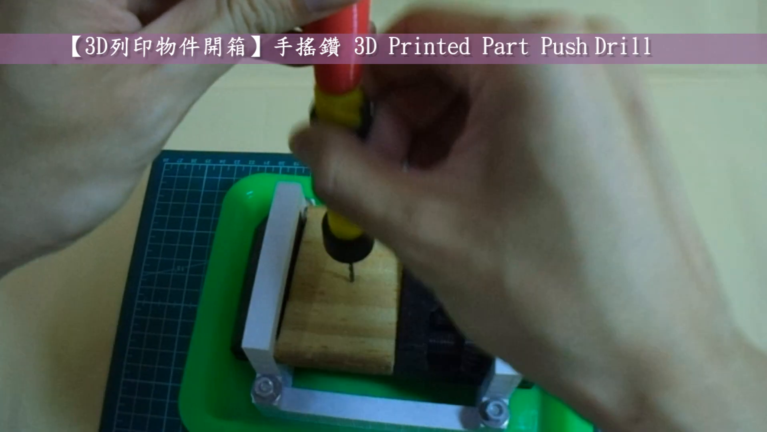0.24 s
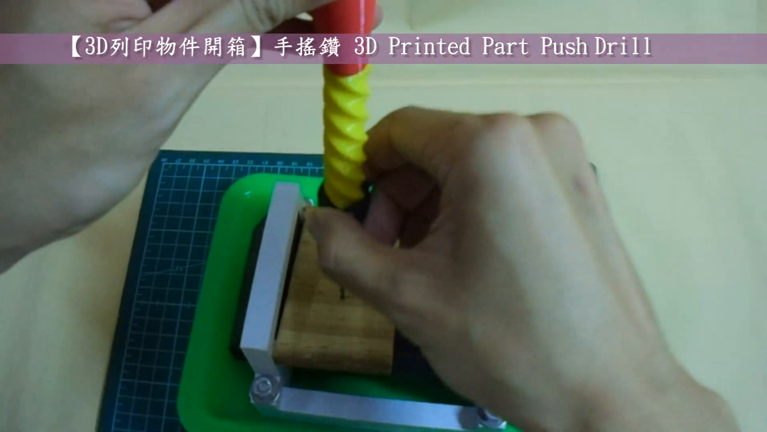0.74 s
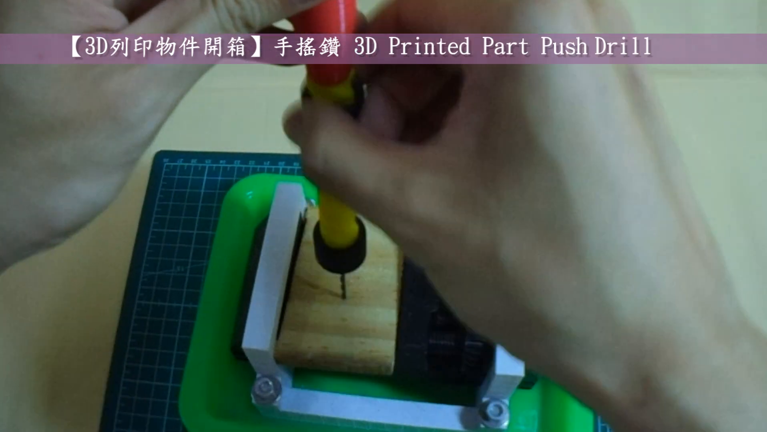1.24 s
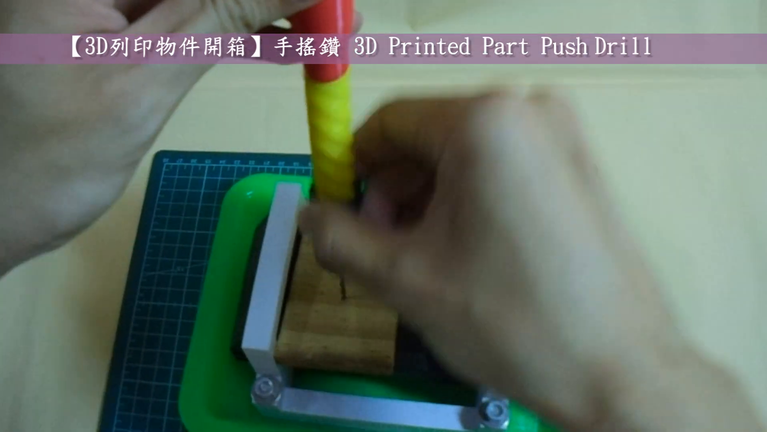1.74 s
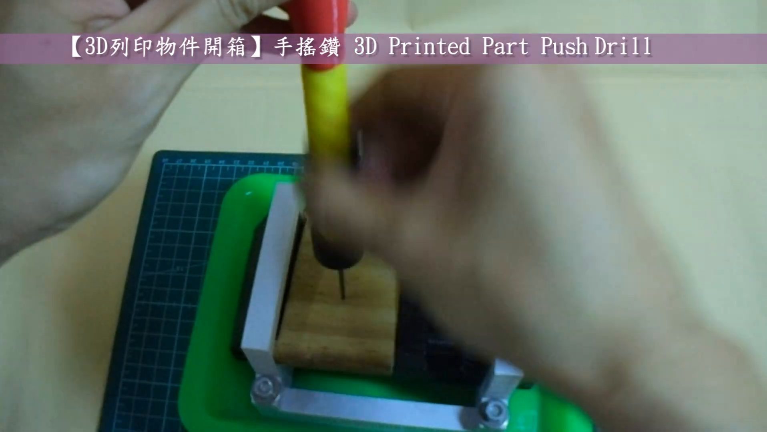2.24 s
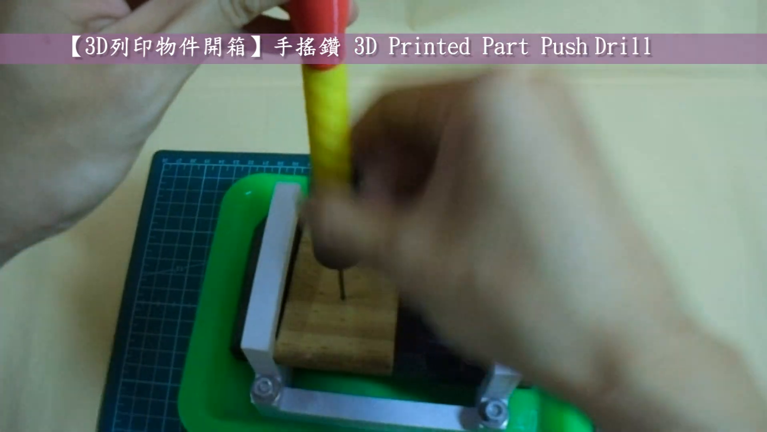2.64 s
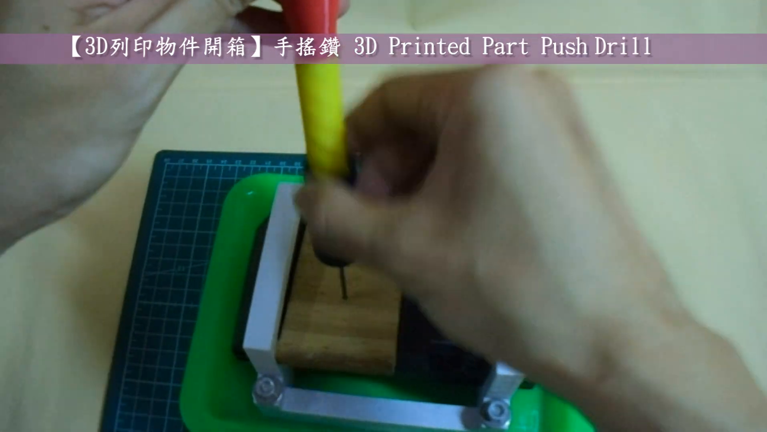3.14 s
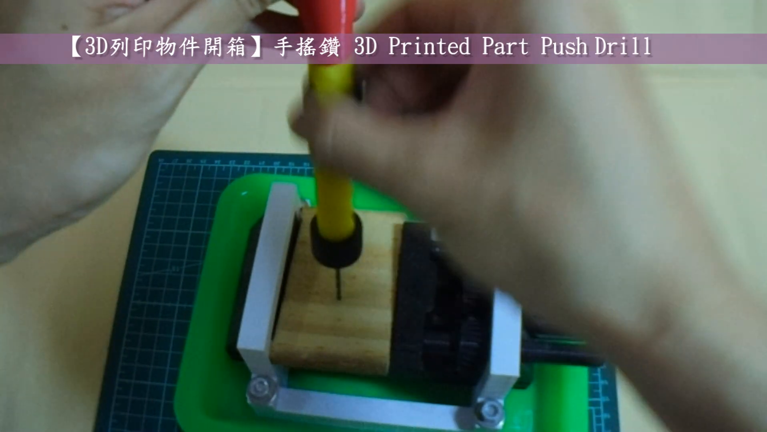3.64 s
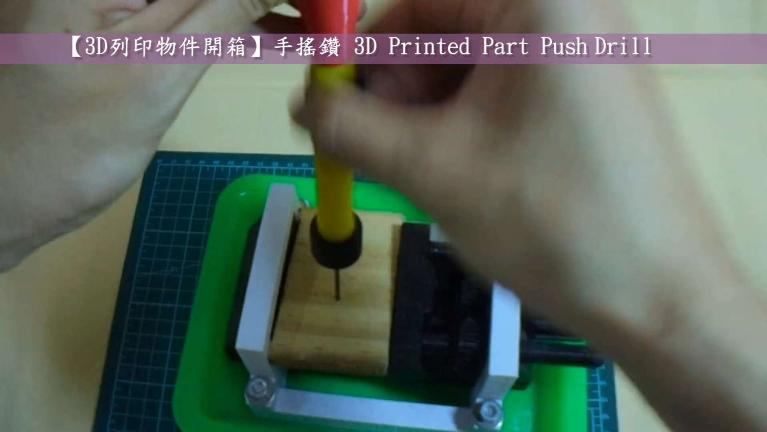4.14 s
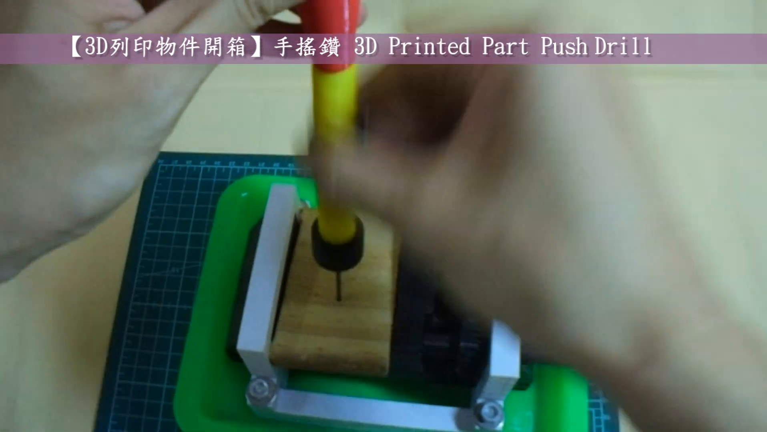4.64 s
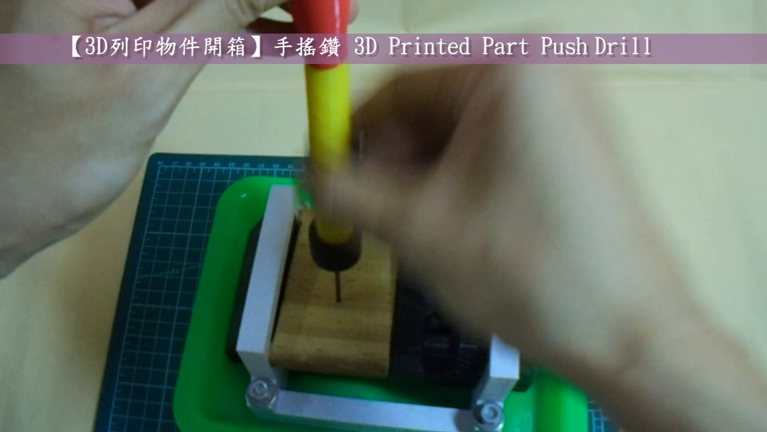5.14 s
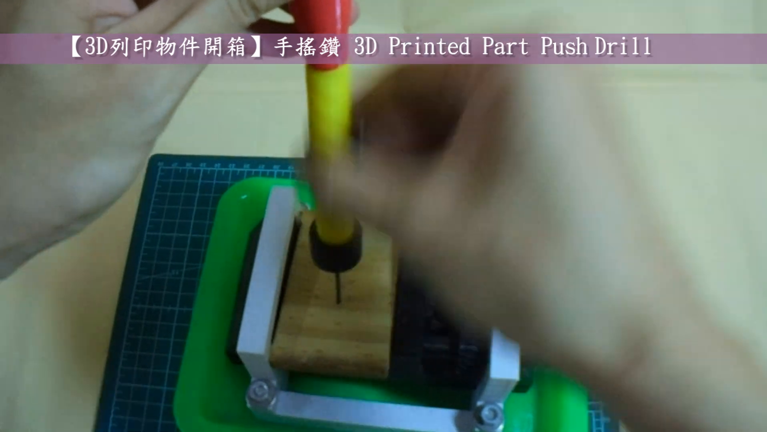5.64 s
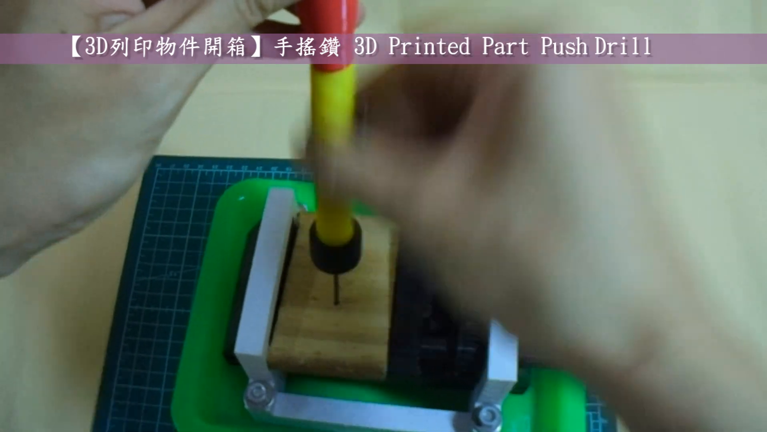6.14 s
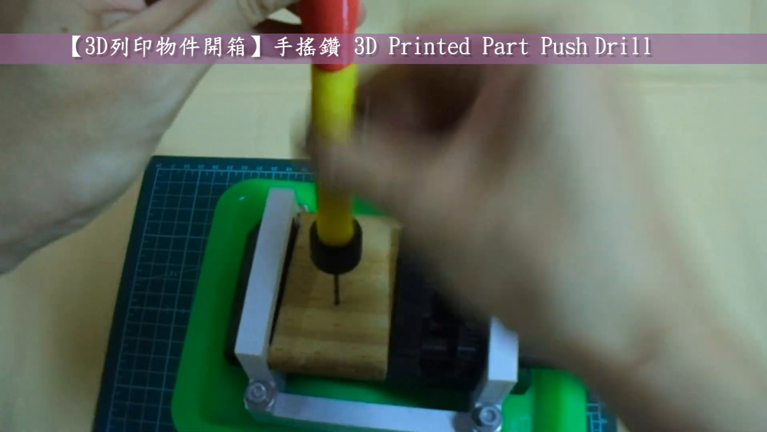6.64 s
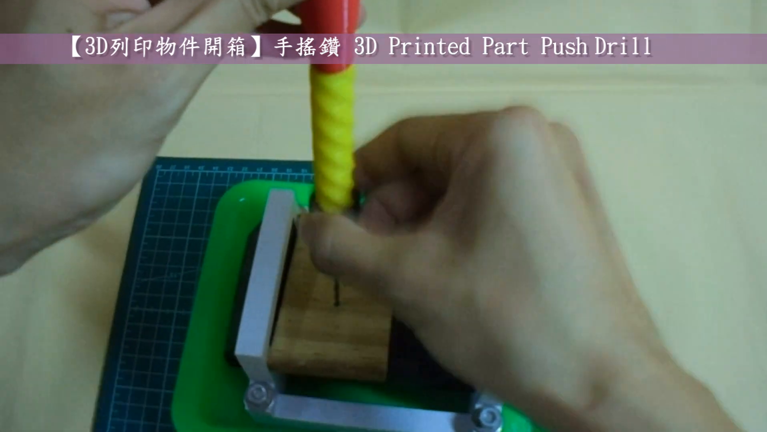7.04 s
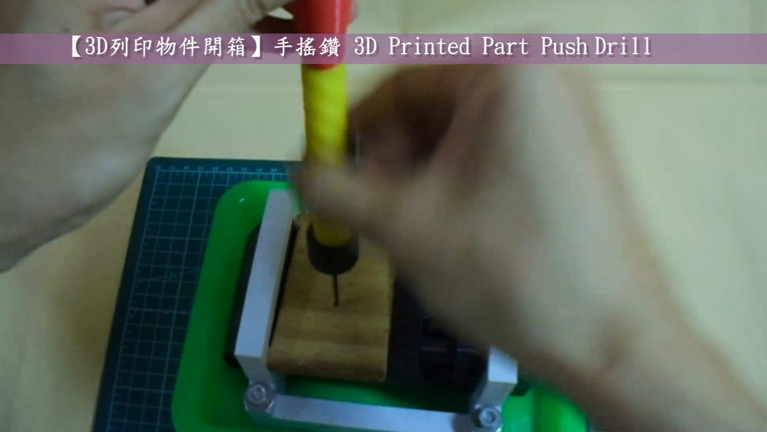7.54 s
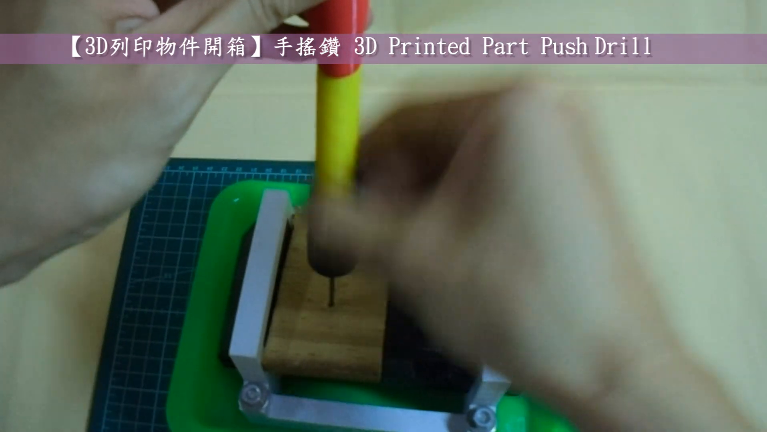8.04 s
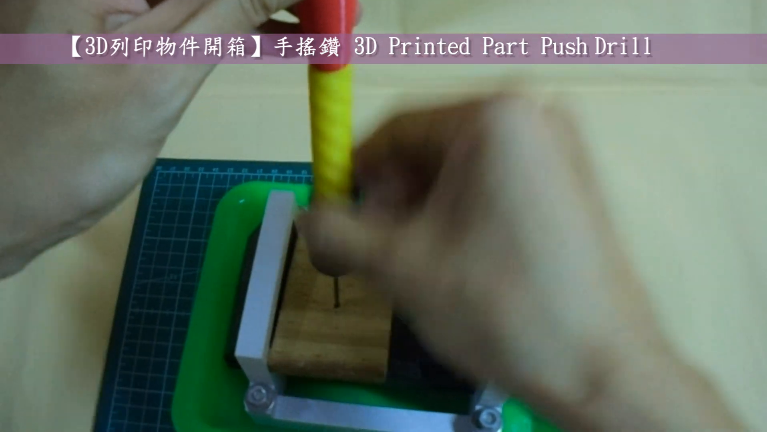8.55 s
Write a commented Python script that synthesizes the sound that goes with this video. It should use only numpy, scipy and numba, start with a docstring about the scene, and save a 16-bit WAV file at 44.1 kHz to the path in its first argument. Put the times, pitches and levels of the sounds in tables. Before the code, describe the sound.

In a small room with low hum and soft air noise, a plastic push drill starts with faint scrapes, a dull knock and two slow, groaning strokes. It then settles into rapid back-and-forth rasping, each stroke a gritty rising and falling zip with squawky edges and small clicks. Close, lo-fi microphone with dull treble.

```python
"""In a small room, a plastic spiral push drill is pumped by hand, about four times a second, into clamped wood.
On every pull and push the nut rasps over the fine ridges of the shaft: uneven noise grains and gliding tones.
The zip follows its speed; squawk, chatter and groan join in, and the loose nut rattles at each turn.
Shaft, block and vice ring as a bank of resonances. Mains and fan hum as wavering sines over shaped air noise."""
import sys
import numpy as np
from scipy import signal
from scipy.fft import rfft, irfft, next_fast_len
from scipy.io import wavfile
from scipy.ndimage import uniform_filter1d, minimum_filter1d
from numba import njit

SR = 44100
rng = np.random.default_rng(int(sys.argv[2]) if len(sys.argv) > 2 else 0)


def wav_record(signal):
    """Record a signal, one row per channel, as 16-bit PCM in the file named by sys.argv[1]."""
    frames = np.transpose(np.atleast_2d(signal))
    bounded = np.clip(frames, -1, 1)
    # unit amplitude maps onto the largest positive 16-bit level
    quanta = np.round(bounded * 32767).astype(np.int16)
    wavfile.write(sys.argv[1], SR, quanta)


N = 387638
TIME = np.arange(N) / SR
FREQ = np.arange(N // 2 + 1) * SR / N + 1e-6
RATE_HZ = 11025  # low sample rate of the recorder; the air noise ends at half of it

# hand strokes, pull and push in turn: start_s, end_s, top_ridge_rate_hz, level_db (drive into the body),
# lean_db (how much harder it ends than it starts)
STROKES = [(0.0, 0.028, 2150, -24, -15), (0.071, 0.094, 1446, -29, 4), (0.188, 0.231, 1936, -35, -7),
           (0.307, 0.38, 2720, -22, -0.5), (0.435, 0.547, 3100, -17.5, -6), (0.573, 0.649, 2756, -19, 1.5),
           (0.78, 0.853, 1590, -21, -12), (0.907, 1.04, 1880, -21.5, -0.5), (1.111, 1.224, 2907, -20, 1),
           (1.259, 1.379, 3436, -16.5, 1.5), (1.426, 1.53, 3870, -17, -2),
           (1.574, 1.682, 2940, -17.5, -1.5), (1.736, 1.832, 2996, -17.5, 2),
           (1.872, 1.982, 2910, -17.5, 6.5), (2.029, 2.13, 2840, -17, -4.5), (2.183, 2.272, 2870, -17, 0.5),
           (2.325, 2.424, 3390, -18, -3), (2.461, 2.571, 3165, -18.5, 2.5),
           (2.615, 2.718, 3750, -15.0, -4.5), (2.754, 2.866, 3210, -17, 1.5), (2.908, 2.996, 3736, -15, 0),
           (3.041, 3.149, 3620, -17.0, 3), (3.18, 3.29, 3690, -16, 3), (3.34, 3.446, 3460, -17, 7),
           (3.483, 3.597, 3437, -16.0, -2.5), (3.638, 3.737, 3460, -17.0, 2.5),
           (3.782, 3.872, 4050, -15.5, -1.5), (3.902, 4.017, 3730, -16.5, 2),
           (4.055, 4.156, 4000, -15.5, -5), (4.19, 4.295, 3836, -15.5, 3), (4.326, 4.426, 3835, -15, -0.5),
           (4.463, 4.559, 4104, -15.5, 3), (4.596, 4.693, 4470, -12.5, -7.5),
           (4.727, 4.829, 4280, -15, 3.5), (4.851, 4.954, 4040, -16, 5), (4.987, 5.082, 4260, -14.5, 7),
           (5.115, 5.21, 4050, -13.5, -1), (5.251, 5.337, 3980, -14, 3), (5.372, 5.464, 4300, -15.0, 2),
           (5.494, 5.592, 4230, -15.5, 5.5), (5.624, 5.713, 4430, -15.5, -4),
           (5.745, 5.838, 3960, -14, 3.5), (5.865, 5.953, 4660, -15, -7), (5.986, 6.079, 4480, -14, 7.5),
           (6.101, 6.197, 4580, -14, -3), (6.226, 6.324, 4590, -15.0, 8), (6.35, 6.444, 4630, -15.5, -5),
           (6.477, 6.574, 3825, -15, 11), (6.6, 6.7, 4660, -14, -7), (6.724, 6.821, 4240, -15, 7.5),
           (6.851, 6.944, 4830, -12.5, -7), (6.972, 7.071, 4340, -14.5, 6.5),
           (7.092, 7.183, 4852, -12.5, -3), (7.214, 7.31, 4517, -14, 7), (7.333, 7.415, 4487, -12.5, -7),
           (7.461, 7.544, 4610, -15.5, 4.5), (7.575, 7.652, 3800, -15, -7.5),
           (7.697, 7.781, 4030, -15.5, 6.5), (7.817, 7.91, 4380, -12.5, -7.5),
           (7.956, 8.037, 4320, -15.5, 2.5), (8.064, 8.163, 4770, -15, -2.5),
           (8.192, 8.288, 4455, -16.5, 0), (8.316, 8.416, 4510, -14.5, 0.5), (8.452, 8.553, 4165, -18, 3),
           (8.572, 8.672, 4800, -15.5, 5.5), (8.703, 8.797, 4220, -16.5, -4.5)]


def drill():
    """Rasp, zip, squawk, groan, chatter and catches all drive the same body."""
    # modes of shaft, block and vice: pitch_hz, width_hz, level_db
    body_modes = [(378, 76, -18.5), (536.4, 35, -14), (664.5, 70, -9), (839, 74, -16), (990, 90, -9),
                  (1109, 80, -3), (1230, 72, 0.5), (1310, 51, 3), (1398, 70, 1), (1636.5, 89.4, 10.5),
                  (1753, 121.7, 10.5), (1897, 119, 8), (2180, 166, 4), (2419, 106, 0.5), (2890, 263, 4),
                  (3372, 75, 4.5), (3512, 130, 3), (3840, 180, 5), (4212, 145, 5.5), (4613, 290, 2.27),
                  (5420, 440, 1)]
    rate, pulling = ridge_rate()
    rasp_db, zip_db, squawk_db = pressure()
    grip = slips(per_s=130, decay_s=0.0057, steady=.25)
    force = rasp(rate, rasp_db, grip) + zip_tone(rate, zip_db, grip)
    force += squawk(rate, squawk_db, grip) + groan(rate, rasp_db)
    force += chatter(rate, pulling, rasp_db, grip) + catches()
    return ring(force, body_modes)


def rasp(rate, level_db, grip):
    """Tiny impacts on the ridges: soft and dull in slow sliding, short and bright in fast."""
    ticks = grip * grains(per_s=4000, spread_db=3)
    soft = signal.sosfilt(signal.butter(1, 2400, fs=SR, output="sos"), ticks)
    bright = ticks - 0.31 * soft
    sharp = np.clip((rate - 450) / 2850, 0, 1)
    return undb(level_db) * (sharp * bright + (1 - sharp) * soft)


def zip_tone(rate, level_db, grip):
    """Evenly spaced ridges sing at the ridge rate; too slow a nut does not zip."""
    # hard pumping shakes the nut and smears the tone
    shake = np.interp(TIME, [1.5, 4.5], [.04, .068])
    fast_enough = np.clip((rate - 1400) / 1100, 0, 1)
    return undb(level_db) * fast_enough * np.sqrt(grip) * ridge_tone(rate, shake)


def squawk(rate, level_db, grip):
    """Friction squawk: a noisy band that glides with the ridge rate."""
    return undb(level_db) * grip * scrape(rate, width_hz=920)


def chatter(rate, pulling, rasp_db, grip):
    """On the pull the tilted nut chatters at a quarter of the ridge rate, never below 1180 Hz."""
    centre_hz = np.maximum(rate * 0.25, 1180)
    return pulling * undb(rasp_db - 13) * grip * scrape(centre_hz, width_hz=300)


def groan(rate, rasp_db):
    """A lazy stroke groans on its ridges: the low gliding tone stands clear of the squawk."""
    slow_enough = np.clip((1640 - rate) / 200, 0, 1)
    return undb(rasp_db - 4) * slow_enough * ridge_tone(rate, jitter=0.0556)


def catches():
    """A tick as the nut takes up its slack in every pull, and catches in the groove here and there."""
    # the nut catches in the groove: time_s, level_db (before the common trim below)
    groove_hits = [(0.1481, -21), (0.2254, -21), (0.2828, -21), (0.4244, -6), (0.4364, -2), (0.7334, -14),
                   (0.7524, -18), (0.8894, -19), (1.0904, -17.5), (1.266, -4), (2.0363, -3.5),
                   (2.0822, -15), (2.7591, -15), (2.9133, -18), (3.042, -9), (3.7693, -5), (3.7848, 0),
                   (4.346, 2.5), (4.7287, -6), (5.0734, 5), (5.4565, -2), (5.6261, 4.5), (5.8721, -10),
                   (7.3457, 1), (7.8156, 3), (8.4552, 0)]
    take_up_db = -5  # re the stroke
    take_ups = [(start + 0.0042, db + take_up_db) for start, _, _, db, _ in STROKES[::2]]
    return taps(take_ups, decay_s=.004) + undb(-9.5) * taps(groove_hits, decay_s=0.0022)


def ridge_rate(edge_hz=1650, edge_share=.63, skew=.9, sharpness=0.98):
    """The hand speeds up and slows down along a lopsided half sine: ridges per second, and how far it pulls."""
    # the hand drags unevenly through two lazy strokes after the knock; one curve each: time_s, ridge_rate_hz
    lazy_curves = [
        [(0.779, 1750), (0.8, 1550), (0.82, 1220), (0.851, 1100)],
        [(0.907, 1450), (0.922, 1250), (0.955, 1600), (0.98, 2050), (1.043, 1450)],
    ]
    rate, pulling = np.full(N, float(edge_hz)), np.zeros(N)
    for k, (start, end, top_hz, _, _) in enumerate(STROKES):
        near = (TIME > start) & (TIME < end)
        way = (TIME[near] - start) / (end - start)
        arch = np.abs(np.sin(np.pi * way ** skew))
        slow_hz = min(edge_hz, edge_share * top_hz)
        rate[near] = slow_hz + (top_hz - slow_hz) * arch ** sharpness
        pulling[near] = arch * (k % 2 == 0)
    for curve in lazy_curves:
        s, hz = np.transpose(curve)
        near = (TIME > s[0]) & (TIME < s[-1])
        rate[near] = np.interp(TIME[near], s, hz)
    return rate, pulling


def pressure(turn_squawk_db=-6, zip_edge_db=-8, zip_floor_db=-35):
    """Levels of rasp, zip and squawk in dB; strokes share one shape, tipped by their lean and varied by chance."""
    # the nut bears hardest as the hand speeds up and brakes: speeding_up_db, full_speed_db, braking_db re the stroke
    rasp_levels = (3, 0, 3)
    # the squawk, a row for pulls and one for pushes: speeding_up_db, full_speed_db, braking_db re the stroke
    squawk_levels = [(-3.5, -16, -2.5), (-4, -13, -3)]
    # the zip holds only near top speed; pull, then push: level_db re the stroke,
    # middle and half_length (shares of the stroke)
    zip_spans = [(-0.5, 0.49, 0.32), (0.5, 0.37, 0.19)]
    # a pull bites at once and brakes late, a push eases in and brakes early; pull, then push:
    # rise_s, braking (share of the stroke)
    manners = [(.007, 0.11), (.016, 0.2)]
    uneven_db = 1.67  # spread: no two strokes press alike
    # the slack nut rattles in each turn, re the stroke, less in a long pause
    turn_rattle_db, rattle_db_per_s = -14.5, -80
    # a faster stroke squawks more and zips less clearly, per octave of top speed above brisk_hz
    brisk_hz, squawk_db_per_oct, zip_db_per_oct = 4030, 3, -4
    rasp_points, squawk_points, zip_db, last_end = [], [], np.full(N, -90.), -1
    chance = uneven_db * rng.standard_normal((len(STROKES), 7))
    for k, (start, end, top_hz, db, lean_db) in enumerate(STROKES):
        length, octaves = end - start, np.log2(top_hz / brisk_hz)
        rise_s, braking = manners[k % 2]
        effort = db + lean_db * np.array([-.5, 0, .5])
        rattle_db = db + turn_rattle_db + rattle_db_per_s * (start - last_end)
        rasp_points += turn_shape(last_end, start, rattle_db, rise_s)
        rasp_points += rasp_shape(start, length, effort + rasp_levels + chance[k, :3])

        brisk_db = squawk_db_per_oct * octaves
        turn_db = rattle_db + turn_squawk_db + brisk_db
        squawk_points += turn_shape(last_end, start, turn_db, rise_s, stop_db=-13, dip_db=0, go_db=5.5)
        levels = effort + brisk_db + squawk_levels[k % 2] + chance[k, 3:6]
        squawk_points += squawk_shape(start, length, levels, braking)

        clear_db, middle, half = zip_spans[k % 2]
        near = (TIME > start) & (TIME < end)
        away = np.abs((TIME[near] - start) / length - middle) / half
        top_db = db + clear_db + zip_db_per_oct * max(octaves, -.5) + chance[k, 6]
        zip_db[near] = top_db + np.maximum(zip_edge_db * away ** 4, zip_floor_db)
        last_end = end
    rasp_db = np.interp(TIME, *np.transpose(rasp_points))
    squawk_db = np.interp(TIME, *np.transpose(squawk_points))
    return rasp_db, zip_db, squawk_db


def rasp_shape(start, length, levels, edge_db=-4, bite=.07, brake=0.86):
    """Points (s, dB): the rasp bites at once, holds through the stroke and lets go at the stop."""
    first, full, last = levels
    way = np.array([0, bite, .5, brake, 1])
    return list(zip(start + length * way, [first + edge_db, first, full, last, last + edge_db]))


def squawk_shape(start, length, levels, braking, bite_db=-6, swell_db=-7):
    """Points (s, dB): the nut squawks as it starts, and again as braking presses it into the groove."""
    first, full, last = levels
    share = np.clip(braking, .06, .3)
    way = np.array([0, .03, .5, 1 - 1.5 * share, 1 - .7 * share, .97])
    return list(zip(start + length * way, [first + bite_db, first, full, last + swell_db, last, last]))


def turn_shape(end, start, db, rise_s, fall_s=.011, stop_db=-2, dip_db=-3, go_db=1):
    """Points (s, dB) between two strokes: the level falls after the stop, then leads into the next stroke."""
    gap = start - end
    stop = (end + min(fall_s, gap / 4), db + stop_db)
    dip = (end + gap / 2, db + dip_db)
    go = (start - min(rise_s, gap / 2), db + go_db)
    return [stop, dip, go]


def slips(per_s, decay_s, steady):
    """Stick and slip: the friction jumps at random moments and dies away; rms 1."""
    jumps = (rng.random(N) < per_s / SR) * rng.uniform(0.21, 1.38, N)
    power = signal.lfilter([1], [1, -np.exp(-1 / (decay_s * SR))], jumps)
    return unit(np.sqrt(steady + power))


def ridge_tone(rate, jitter):
    """The nut ticks over evenly spaced ridges; its speed shakes and its pressure comes and goes; rms 1."""
    shaken_hz = rate * (1 + jitter * walk(450))
    phase = 2 * np.pi * np.cumsum(shaken_hz) / SR
    press_db = 2 * walk(50) + 2.5 * walk(300)
    return unit(np.sin(phase) * undb(press_db))


def scrape(hz, width_hz):
    """Uneven ticks that crowd closely round one moving rate; rms 1."""
    centre = np.clip(hz, 100, .4 * SR)
    once = sweep(grains(per_s=4000, spread_db=2.0), centre, float(width_hz))
    return unit(sweep(once, centre, float(width_hz)))


def grains(per_s, spread_db):
    """Random tiny impacts of uneven size, rms 1 in the lowest quarter of the band."""
    hit = rng.random(N) < per_s / SR
    size = undb(spread_db * np.clip(rng.standard_normal(N), -2, 2))
    return 2 * unit(hit * size * rng.choice([-1, 1], N))


@njit
def sweep(x, hz, width):
    """Band-pass whose centre moves: a state-variable filter of constant width in Hz."""
    y, band, low = np.empty(len(x)), 0., 0.
    for i in range(len(x)):
        g, k = np.tan(np.pi * hz[i] / SR), width / hz[i]
        v = (band + g * (x[i] - low)) / (1 + g * (g + k))
        band, low, y[i] = 2 * v - band, low + 2 * g * v, k * v
    return y


def end_stop():
    """The nut hits its end stop: a dull knock that goes down through the bit into block and table."""
    # knocks, at times with a bounce: time_s, level_db (before the gain below)
    stop_hits = [(0.070, -30.5), (0.7228, -26), (0.7262, -20.5), (0.7412, -31), (7.347, -30)]
    # modes of the knock: pitch_hz, width_hz, level_db
    stop_modes = [(212, 69, -10.5), (330, 61, -7), (628, 71, 0), (836, 45, 0), (1094, 150, 0.5),
                  (1960, 510, -6), (3200, 450, -13.5)]
    return undb(20.5) * ring(taps(stop_hits, decay_s=0.0021), stop_modes)


def taps(table, decay_s):
    """A sharp push with a short scrape after it for each (s, dB) row."""
    force = np.zeros(N)
    age = np.arange(SR // 50) / SR
    for s, db in table:
        push = 2.1 * rng.standard_normal(len(age)) * np.exp(-age / decay_s)
        push[0] = 6
        start = int(s * SR)
        force[start:start + len(age)] += undb(db) * push
    return force


def ring(x, modes):
    """Sound through a set of resonances; neighbouring modes move in opposite senses."""
    size = next_fast_len(N + SR // 10)
    freq = np.arange(size // 2 + 1) * SR / size + 1e-6
    response = 0
    for k, (hz, width, db) in enumerate(modes):
        response = response + (-1) ** k * undb(db) / (1 + 1j * (freq ** 2 - hz ** 2) / (freq * width))
    return irfft(rfft(x, size) * response, size)[:N]


def reflections(x, t60_s, wet_db):
    """Short diffuse tail of the small room: decaying noise after a 4 ms gap."""
    age = np.arange(SR // 2) / SR
    tail = rng.standard_normal(len(age)) * undb(-60 * age / t60_s) * (age > .004)
    return undb(wet_db) * signal.fftconvolve(x, tail / np.linalg.norm(tail))[:N]


def room():
    """Steady air noise with slightly wavering hum lines."""
    # hum of mains and fan: pitch_hz, level_db (rms)
    hum_lines = [(59.6, -58.5), (118.4, -49.5), (195.3, -55)]
    # colour of the air noise: pitch_hz, level_db (per Hz, relative)
    air_colour = [(20, 2), (40, -1.5), (80, -3), (150, -4), (210, -3.5), (270, -7), (340, -7.5),
                  (470, -8.5), (620, -1), (780, -8), (1500, -9), (3000, -10.5), (5500, -30.5)]
    air_db = -41.5  # rms
    hz, db = np.transpose(air_colour)
    shape = undb(np.interp(np.log(FREQ), np.log(hz), db)) * (FREQ < RATE_HZ / 2)
    sound = undb(air_db) * unit(irfft(rfft(rng.standard_normal(N)) * shape, N))
    for line_hz, line_db in hum_lines:
        phase = 2 * np.pi * np.cumsum(line_hz + 0.43 * walk(2)) / SR
        sound += undb(line_db) * unit(np.sin(phase))
    return sound


def walk(rate_hz):
    """Smooth, bounded chance of spread about 1 that changes about rate_hz times a second."""
    slow = irfft(rfft(rng.standard_normal(N)) / (1 + (FREQ / rate_hz) ** 4), N)
    return np.clip(unit(slow), -2, 2)


def undb(db):
    """Decibels to gain."""
    return 10 ** (np.asarray(db) / 20)


def unit(x):
    """Scale to rms 1."""
    return x / np.sqrt(np.mean(x ** 2))


def scene():
    """Drill and knocks, with their reflections, in the humming room."""
    tool = drill() + end_stop()
    return (tool + reflections(tool, t60_s=0.23, wet_db=-17.0) + room())[None]


def record(dry):
    """A limiter, then a low sample rate: straight lines join the samples and mirror the rasp faintly into the treble."""
    top_hz = 16200
    step, hold = SR // RATE_HZ, SR // 200
    peak_gain = 1 / np.maximum(np.abs(dry[0]), 1)
    gain = uniform_filter1d(minimum_filter1d(peak_gain, hold), hold)
    samples = signal.resample_poly(dry[0] * gain, 1, step)
    joined = np.interp(np.arange(N), np.arange(len(samples)) * step, samples)
    return signal.sosfilt(signal.ellip(10, .1, 70, top_hz, fs=SR, output="sos"), joined)[None]


dry = scene()
out = record(dry)
wav_record(out)
```